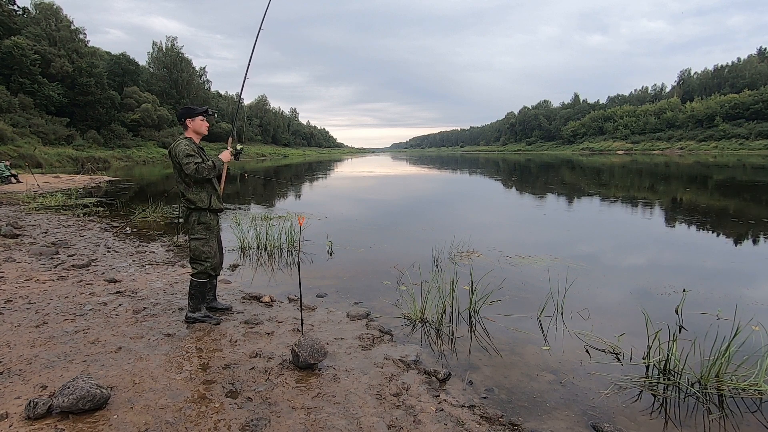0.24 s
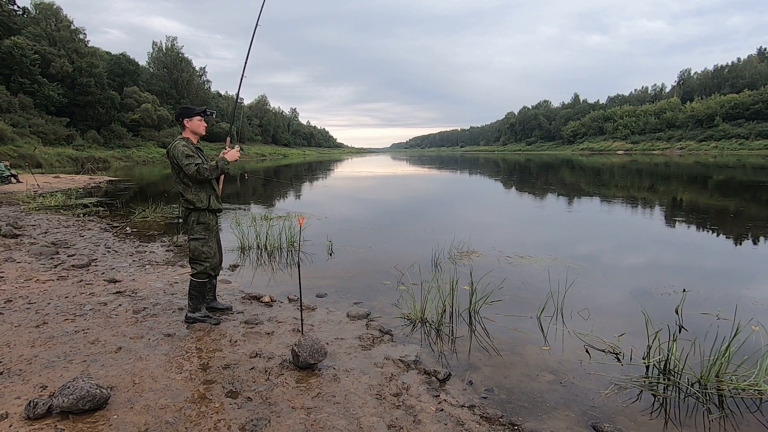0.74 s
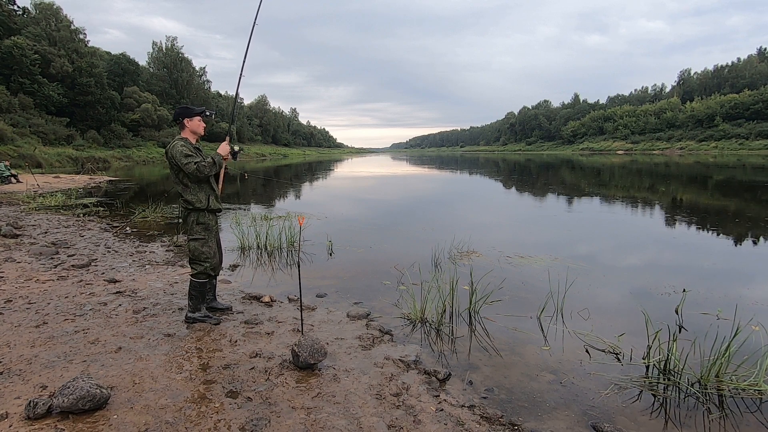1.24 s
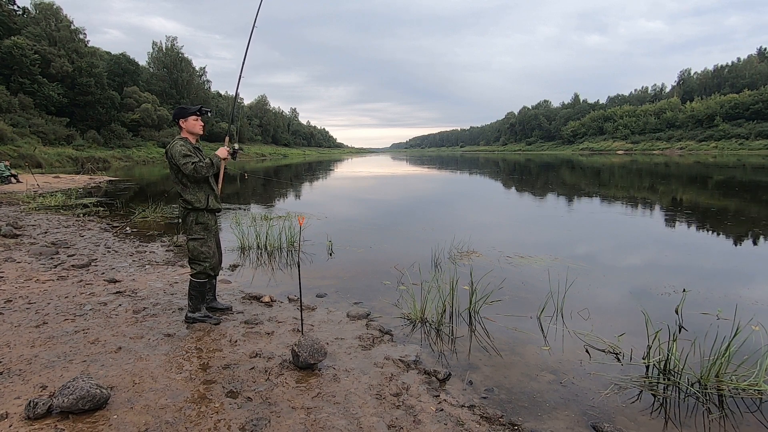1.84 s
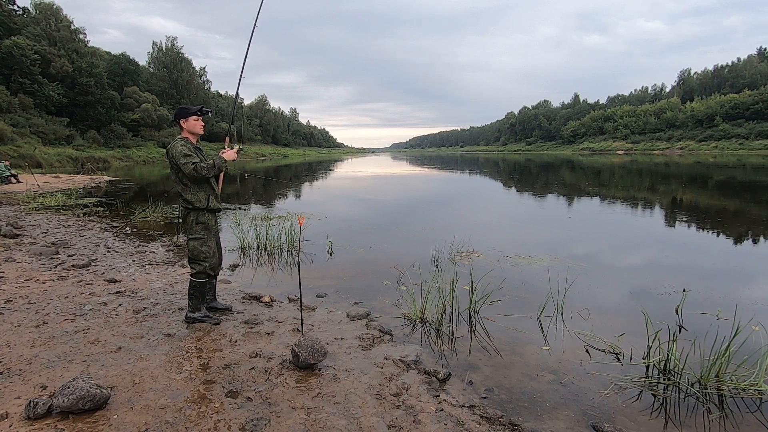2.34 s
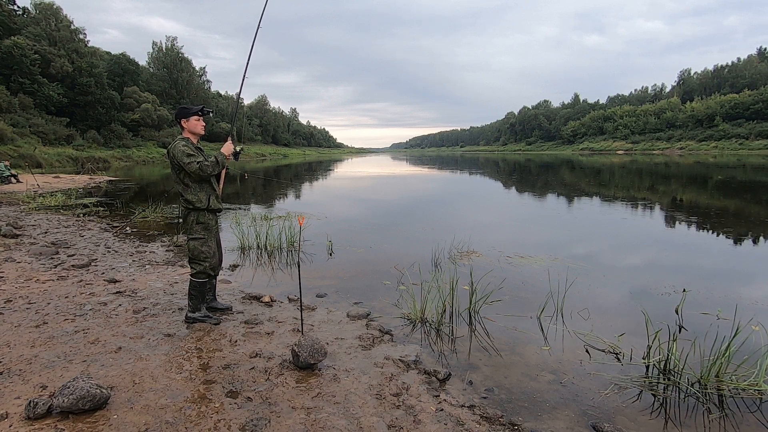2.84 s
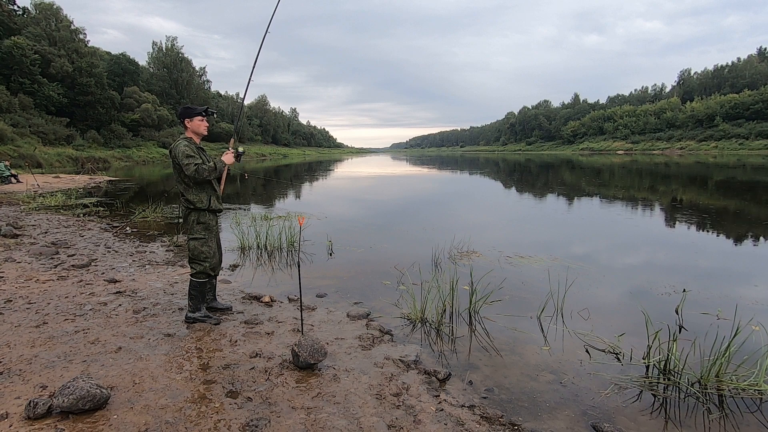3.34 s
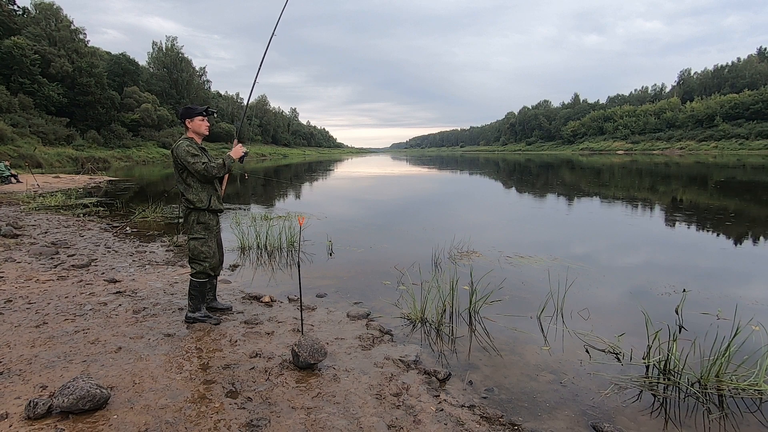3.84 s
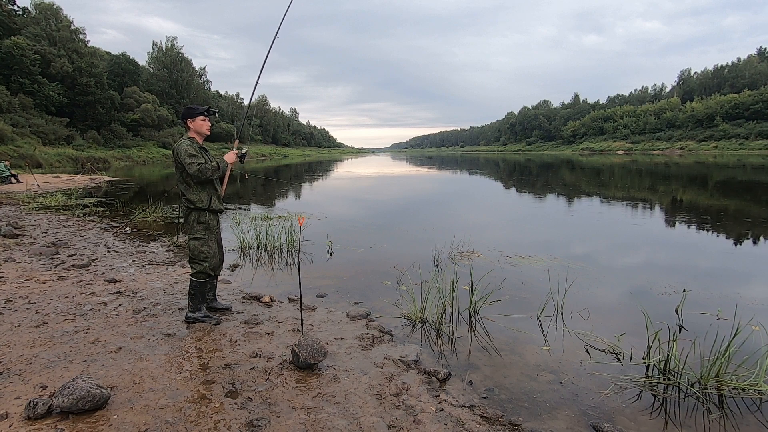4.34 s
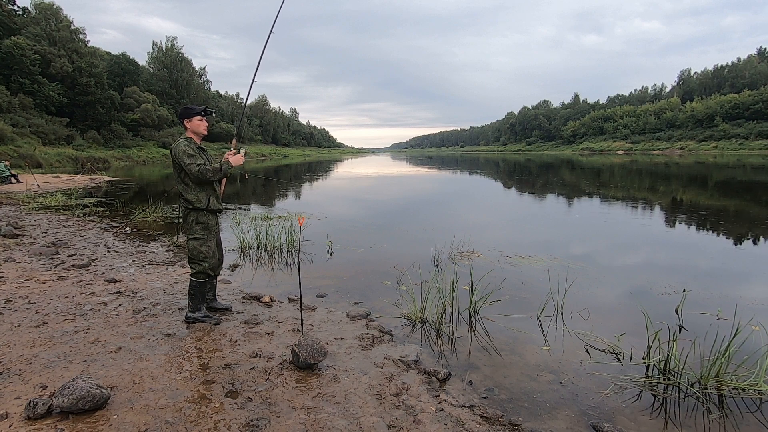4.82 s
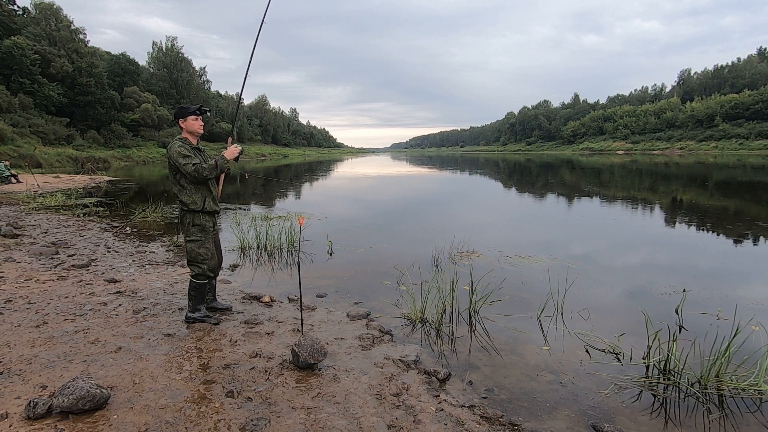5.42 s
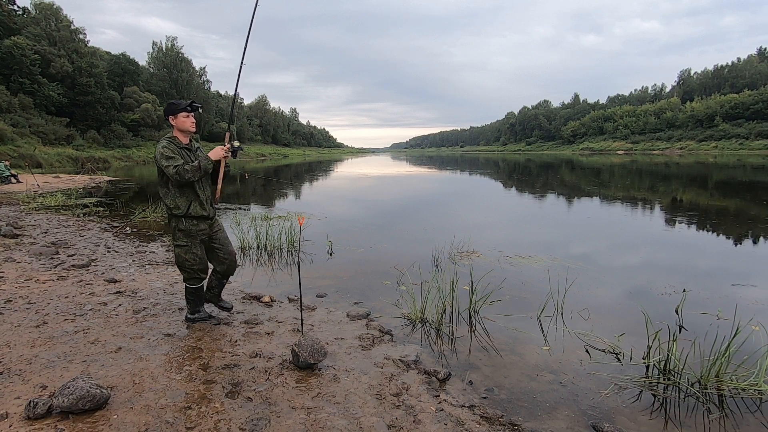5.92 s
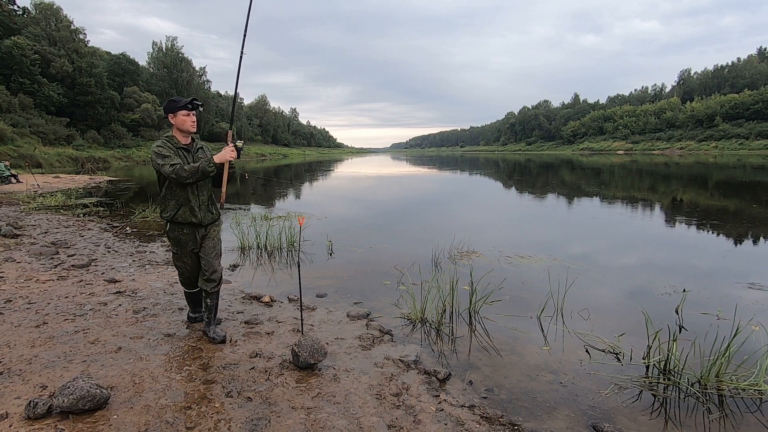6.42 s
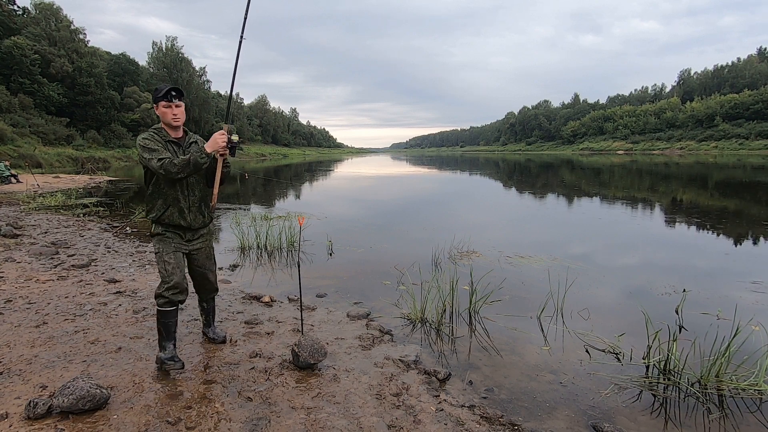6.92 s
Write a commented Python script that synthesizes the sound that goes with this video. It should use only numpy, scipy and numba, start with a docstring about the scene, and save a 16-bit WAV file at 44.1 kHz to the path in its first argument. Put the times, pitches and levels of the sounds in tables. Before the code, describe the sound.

On a quiet river bank, a few metres from the microphone, a fishing reel is wound throughout: a grainy mid-pitched whirr with an unsteady gear whine, and faint high line hiss swelling and fading. Above it a tiny rod bell rattles from the start, bright, dry ticks around 5.5 kHz, each dying almost at once, in irregular clusters; especially dense and loud near 2.4-2.7 s, sparser around 4.6-5.5 s. From 1.3 to 2 s a distant wader gives four short, high, warbled notes with some echo. Single light plastic knocks occur near 0.6, 3.8, 4.1 and 5.3 s, then a hard clatter at 5.5-5.9 s, the loudest moment. Boots squelch in mud at 6.3 and 6.6 s, and a nearer step at 7.0-7.15 s crunches and pops over a slight ground thump. A soft low hum and wide airy wash stay behind; bell and reel continue to the end.

```python
"""An angler winds in his line on a muddy river bank, a few metres from the listener, over a far hum.
From the start a tiny bell on the rod rattles as a struck, quickly damped shell; the reel's gear teeth whine
and whirr through its housing, and line hisses in the rings as band noise. A wader soon calls in warbled sines.
The reel knocks in bursts of damped modes, loudest past five seconds; then boots squelch: shaped noise and pops."""
import sys
import numpy as np
from scipy import signal
from scipy.fft import rfft, irfft
from scipy.io import wavfile
from scipy.ndimage import uniform_filter1d
from numba import njit

SR = 44100
rng = np.random.default_rng(int(sys.argv[2]) if len(sys.argv) > 2 else 0)


def inscribe(sig):
    """Save sig as 16-bit PCM at rate SR to the path in sys.argv[1].

    A 1-D sig is mono; a 2-D sig holds one channel per row.
    Samples are clipped to [-1, 1] before scaling.
    """
    pcm = np.round(np.clip(np.atleast_2d(sig).T, -1, 1) * 32767)
    wavfile.write(sys.argv[1], SR, pcm.astype(np.int16))


def to_linear_factor(level_db):
    """Convert decibel levels (scalar or array-like) to linear amplitude factors."""
    exponent = np.asarray(level_db, float) / 20
    return 10 ** exponent


N = 316197
T = np.arange(N) / SR

# modes of the bell's shell, before each blow shifts and damps them: f/Hz, level/dB, t60/s
BELL_MODES = [(5420, 5, 0.024), (5540, -6.5, 0.022), (5750, -7.5, 0.01), (6416, -22, 0.02),
              (12780, -30.5, 0.012), (14400, -40.5, 0.022)]


def unit(x):
    """Normalisation: scale to rms 1."""
    return x / np.sqrt(np.mean(x ** 2))


def pan(x, lr_db):
    """Level-difference stereo: left exceeds right by lr_db."""
    return np.array([x * to_linear_factor(lr_db / 2), x * to_linear_factor(-lr_db / 2)])


@njit
def svf(x, hz, width):
    """State-variable resonator: a band-pass whose centre may move, gain 1 at the centre."""
    y, b, l = np.empty(len(x)), 0., 0.
    for i in range(len(x)):
        g, k = np.tan(np.pi * hz[i] / SR), width / hz[i]
        v = (b + g * (x[i] - l)) / (1 + g * (g + k))
        b, l, y[i] = 2 * v - b, l + 2 * g * v, k * v
    return y


def band(x, hz, width):
    """Cascaded resonators: the same band-pass twice gives steeper skirts."""
    hz = hz + np.zeros(len(x))
    return svf(svf(x, hz, 1. * width), hz, 1. * width)


def walk(rate):
    """Smoothed random steps, rate a second: a slow fluctuation of rms 1."""
    k = int(SR / rate)
    steps = np.repeat(rng.standard_normal(N // k + 1), k)
    return unit(uniform_filter1d(uniform_filter1d(steps, k), k)[:N])


def ring(modes, rise_s):
    """Modal superposition: exponentially fading sines after a soft rise."""
    t = T[:SR // 12]
    fading = sum(to_linear_factor(db) * np.sin(2 * np.pi * hz * t) * 1000 ** (-t / t60) for hz, db, t60 in modes)
    return (1 - np.exp(-t / rise_s)) ** 2 * fading


def add(out, s, x):
    """Superposition: mix a short sound in at time s."""
    i = int(s * SR)
    out[:, i:i + x.shape[1]] += x[:, :N - i]


def sparse(rate, spread_db):
    """Random impulse train, rate a second: mostly small clicks, a few large."""
    struck = rng.random(N) < rate / SR
    return struck * to_linear_factor(spread_db * rng.exponential(size=N)) * rng.choice([-1, 1], N)


def shape(x, points):
    """Linear filtering in the spectrum: gain through (Hz, dB) points on a log axis."""
    hz, db = np.transpose(points)
    f = np.maximum(np.fft.rfftfreq(N, 1 / SR), 1)
    return irfft(rfft(x) * to_linear_factor(np.interp(np.log(f), np.log(hz), db)), N)


def peak(s, db, rise_s, fall_s):
    """Exponential envelope: climbs to db at time s and sinks, 20 dB per rise or fall time."""
    return to_linear_factor(db - 20 * np.maximum((s - T) / rise_s, (T - s) / fall_s))


def bank(x, wet_db, t60_s):
    """Diffuse reflection: short scattered echo of ground, water and trees, different left and right."""
    t = T[:SR // 3]
    tail = rng.standard_normal((2, len(t))) * 1000 ** (-t / t60_s) * (t > .003)
    tail = tail / np.sqrt(np.sum(tail ** 2) / 2)
    return x + to_linear_factor(wet_db) * signal.fftconvolve(x, tail, axes=1)[:, :N]


def valley_wash():
    """Diffuse noise field: half-octave-spaced bands flicker independently, each with its own stereo width."""
    # colour of the wash: f/Hz, nominal spectral level/dB per Hz
    wash_colour = [(25, -97.5), (65, -89), (110, -101), (150, -82), (215, -87.5), (370, -94), (500, -102),
                   (800, -91), (1050, -104), (2000, -95), (4300, -102), (6500, -103), (10500, -110),
                   (12000, -122), (15000, -126)]
    # stereo width: f/Hz, amplitude ratio of side to mid
    side_ratio = [(30, 0.78), (100, 0.63), (700, 2.34), (2000, 1.94), (6000, 0.21), (9000, 1.74),
                  (15000, 2)]
    side_hz, side_gain = np.transpose(side_ratio)
    out = 0
    for hz in 28 * 2 ** np.arange(0, 9.2, .5):
        mid, side = (unit(band(rng.standard_normal(N), hz, hz / 2)) for _ in range(2))
        wide = np.interp(np.log(hz), np.log(side_hz), side_gain)
        flicker = to_linear_factor(2.86 * walk(11))
        # power grows with bandwidth, so the spectral density is about level
        out = out + flicker * np.sqrt(hz / 3) * (mid + wide * side * np.array([[1], [-1]]))
    return shape(out, wash_colour)


def far_hum():
    """Narrow-band noise: random beating makes the hum waver."""
    return to_linear_factor(-67.5) * unit(band(rng.standard_normal(N), 151.3, 10.4))


def wader():
    """Frequency modulation: the wader's notes glide under a warble that fades."""
    # notes: t/s, length/s, first f/Hz and last f/Hz of the glide, level/dB of the sine's peak
    notes = [(1.309, 0.14, 7040, 6560, -44), (1.509, 0.11, 6810, 6690, -46),
             (1.691, 0.0993, 6820, 6610, -46), (1.887, 0.1, 6600, 6630, -53)]
    warble_hz, warble_depth_hz, warble_fade_s = 37.6, 302.2, 0.027
    out = np.zeros((2, N))
    for s, length, top_hz, last_hz, db in notes:
        t = T[:int(length * SR)]
        glide = top_hz + (last_hz - top_hz) * t / length
        warble = warble_depth_hz * np.exp(-t / warble_fade_s) * np.cos(2 * np.pi * warble_hz * t)
        tone = np.sin(2 * np.pi * np.cumsum(glide - warble) / SR)
        gain = signal.windows.tukey(len(t), .25) * to_linear_factor(db + walk(54.0)[:len(t)])
        add(out, s, pan(gain * tone, 0.37))
    return out


def mud():
    """Granular excitation: mud gives with a thud, sucks through a closing gap, and grit crunches."""
    # levels hold before the common colour in boots(); rise and fall are the times for 20 dB
    # mud giving way: t/s, level/dB, rise/s, fall/s
    thuds = [(6.33, -45.5, 0.033, 0.17), (6.58, -42.5, 0.12, 0.035), (6.625, -31.5, 0.0018, 0.012),
             (7.04, -51.5, 0.024, 0.099), (7.11, -44.5, 0.06, 0.099)]
    # grit crunching: t/s, level/dB, rise/s, fall/s
    crunches = [(6.327, -39.5, 0.033, 0.16), (6.531, -39, 0.044, 0.044), (6.57, -35.5, .04, .02),
                (6.623, -31.5, 0.0053, 0.019), (7.031, -33.5, 0.0035, 0.013), (7.051, -42, .03, 0.0038),
                (7.12, -40.5, 0.072, 0.049)]
    # mud sucking: t/s, level/dB, rise/s, fall/s, f/Hz at time t
    sucks = [(6.326, -52.5, 0.06, 0.15, 1094), (6.531, -35, 0.063, 0.023, 1360),
             (6.555, -33, 0.061, 0.034, 850), (6.623, -38, 0.01, 0.011, 1470),
             (7.16, -50, 0.11, 0.098, 1460)]
    suck_sag_hz_per_s = 1640
    thud = unit(band(sparse(611.5, 1.7), 242.6, 530))
    grit_colour = [(600, -23), (1800, 2.0), (3800, 0.0), (7000, -16.5), (10000, -6.0), (12000, -65)]
    grit = unit(shape(np.clip(sparse(2000, 1.9), -4, 4), grit_colour))
    slurp = sparse(1500, 1.7)
    sucking = 0
    for s, db, rise_s, fall_s, hz in sucks:
        gap_hz = np.clip(hz - suck_sag_hz_per_s * (T - s), 600, 1800)
        sucking = sucking + peak(s, db, rise_s, fall_s) * unit(band(slurp, gap_hz, 457))
    thudding = sum(peak(*row) for row in thuds) * thud
    crunching = sum(peak(*row) for row in crunches) * grit
    return pan(thudding + sucking + crunching, 1.0)


def sand():
    """Granular noise: wet sand sizzles under the sole as many small clicks in one band."""
    # sizzles: t/s, level/dB before the common colour in boots(), rise/s and fall/s for 20 dB
    sizzles = [(6.33, -55, .05, .15), (6.56, -63, 0.074, 0.066), (6.95, -42.5, 0.041, 0.079),
               (7.09, -47.5, 0.045, 0.15)]
    sizzle = unit(band(sparse(4400, 3.6), 6640, 1694))
    return pan(sum(peak(*row) for row in sizzles) * sizzle, 1.5)


def pops_and_thumps():
    """Damped resonance: each mud bubble, pebble or low thump is one mode, its decay time inverse to its pitch."""
    # t/s, peak level/dB before the common colour in boots(), f/Hz; the low thump at 4.13 s sounds under a reel knock
    pop_modes = [(4.13, -50, 336.7), (6.31, -27, 2780), (6.325, -38, 196), (6.381, -27, 1900),
                 (6.397, -29, 2160), (6.534, -39, 1483), (6.582, -35, 186), (6.768, -45.5, 342),
                 (6.919, -46.5, 266.5), (6.338, -36, 3400), (7.0391, -17, 3340), (7.042, -22, 2575),
                 (7.044, -29, 2800), (7.1205, -24, 3960), (7.127, -29, 2970), (7.1452, -27, 2880),
                 (7.159, -23, 3340)]
    out = np.zeros((2, N))
    for s, db, hz in pop_modes:
        rise_s = 0.33 / hz + 0.008 * (hz < 500)  # low ones start softer
        pop = ring([(hz, 0, 8 / hz)], rise_s)
        add(out, s, pan(to_linear_factor(db) * pop / np.abs(pop).max(), 0.52))
    return out


def boots():
    """Superposition: boot sounds, pops and thumps under one colour, plus a rumble carried by the ground."""
    # the last, nearest step reaches the ground under the microphone
    ground = peak(7.1, -51, 0.043, .05) * unit(band(rng.standard_normal(N), 70, 80))
    contacts = mud() + sand() + pops_and_thumps()
    return shape(contacts, [(70, -24), (140, 2.0), (6000, -2.5), (12000, -15.0)]) + ground


def knocks():
    """Impact excitation of modes: plastic on plastic, each blow with its own spectral tilt."""
    # blows: t/s, peak level/dB before colouring, tilt/dB per octave, frequency factor of the modes under the hand
    knock_blows = [(0.56, -38, 2, 1.1), (3.819, -37, 13, 0.94), (4.131, -43, -45, 0.83),
                   (5.272, -35, 11, 0.85), (5.5316, -24.5, 16.5, 0.86), (5.5488, -32, 17, 0.9),
                   (5.655, -38, -1, 1.13), (5.7377, -15.5, 5, 0.97), (5.7609, -35, 2, 0.76),
                   (5.7602, -21, 7, 1), (5.829, -18, 6, 1.04), (5.8747, -20, 8, 1.06)]
    # modes before tilt and stretch: f/Hz, level/dB, t60/s
    knock_modes = [(820, -12, 0.009), (1270, 0, 0.019), (1750, 3, 0.01), (2250, -4, 0.009), (2790, 2, 0.01),
                   (3560, -5, 0.008), (4760, -10, 0.006), (5800, -17, 0.006)]
    out = np.zeros((2, N))
    for s, db, tilt_db, stretch in knock_blows:
        modes = [(hz * stretch, g + tilt_db * np.log2(hz / 1200), t60) for hz, g, t60 in knock_modes]
        blow = ring(modes, 0.00007)
        add(out, s, pan(-to_linear_factor(db) * blow / np.abs(blow).max(), 3.15))
    return shape(out, [(250, -11.5), (900, 2.5), (4500, 4.5), (7000, -14)])


def line_hiss():
    """Friction noise: wet line runs through the rod rings, and the hiss drops in pitch as it swells."""
    # wet stretches: t/s at the middle, level/dB before the quarter gain below, length/s
    swishes = [(0.143, -55, 0.78), (1.85, -56.5, 1), (2.549, -52, 0.39), (2.87, -56.5, 0.44),
               (3.347, -56.5, 0.6), (3.84, -52, 0.23), (4.314, -51.5, 0.99), (5.024, -53, 0.38),
               (5.8, -63, .2), (6.486, -53, 0.89)]
    swells = [np.exp(-8 * ((T - s) / length) ** 2) for s, _, length in swishes]
    hiss_hz = 9820 - 540 * np.max(swells, axis=0)
    hiss = np.array([unit(band(rng.standard_normal(N), hiss_hz, 1500)) for _ in range(2)])
    hiss = hiss * to_linear_factor(1.8 * walk(25))
    wet = to_linear_factor(-81) + sum(to_linear_factor(row[1]) * swell for row, swell in zip(swishes, swells))
    return pan(0.25, 5.3)[:, None] * hiss * wet


def gear_whine():
    """Harmonic series at the meshing rate of the unevenly turned crank; returned with its gain."""
    # crank: t/s, mean meshing f/Hz, whine against the whirr level/dB
    crank = [(0.0, 620, -10), (0.341, 515, -15), (0.58, 740, -0.5), (0.74, 530, 1), (0.88, 516, -2),
             (0.94, 756, 0), (1.141, 550, -7.5), (1.279, 543, -8), (1.421, 780, 1.5), (1.52, 650, -4.5),
             (1.8, 600, -4), (1.88, 550, -8), (2.04, 660, 3), (2.29, 685, -4), (2.389, 557, -4.5),
             (2.48, 538.5, 1.5), (2.559, 720, 4.5), (2.64, 525, 1), (2.72, 540, -12), (2.85, 590, -4),
             (2.93, 596, -3.5), (3.05, 730, -3), (3.39, 534, -6), (3.87, 570, -7), (3.951, 600, -2),
             (4.03, 529.7, -1), (4.17, 600, -7), (4.25, 735, 8), (4.29, 650, -4.5), (4.77, 546, -7),
             (4.85, 687.4, 3), (4.91, 630, -11), (4.99, 810, 7), (5.05, 640, -1.5), (5.17, 620, 3.5),
             (5.28, 580, -11), (5.55, 510, -10), (6.19, 515, -9), (6.371, 790, -2.5), (6.571, 660, -11),
             (6.67, 820, 4.5), (6.73, 685, -0.5), (6.93, 710, 2.5), (6.99, 560, -1.5), (7.17, 630, -8)]
    s, mesh_hz, whine_db = np.transpose(crank)
    mesh_hz = np.interp(T, s, mesh_hz) * (1 + .024 * walk(40))
    phase = 2 * np.pi * np.cumsum(mesh_hz) / SR
    # the third harmonic is strongest, 4 dB lost per harmonic away from it
    whine = sum(to_linear_factor(6 * np.tanh(walk(35)) - 4 * abs(k - 3)) * np.cos(k * phase) for k in range(1, 8))
    return whine, to_linear_factor(np.interp(T, s, whine_db))


def line_roller():
    """Harmonics of a drifting rotation: the line roller spins at its own speed, singing in broken strands."""
    spin_hz = 430 * (1 + .07 * walk(12) + .03 * walk(70))
    spin = 2 * np.pi * np.cumsum(spin_hz) / SR
    return sum(to_linear_factor(6 * np.tanh(walk(30))) * np.cos(k * spin) for k in range(3, 9))


def reel():
    """Source and resonator: gear teeth whine and rub, both heard through the housing's resonances."""
    # winding: t/s, whirr level/dB, brightness/dB per octave as the reel faces the microphone
    winding = [(0.0, -51, -4.5), (0.5, -50, 0.5), (0.9, -50, 7.5), (1.5, -48.5, -1), (1.9, -50.5, -0.5),
               (2.6, -50.5, -0.5), (3.35, -48.5, -1.5), (3.7, -51.5, -5), (4.05, -49, -0.5),
               (4.7, -49.5, 2), (5.1, -48, 2), (5.5, -49, 2.5), (6.07, -50.5, -0.5), (6.5, -49.5, -1.5),
               (6.85, -50.5, -3), (7.17, -50.5, -3)]
    # housing resonances before widening and grip: f/Hz, bandwidth/Hz, level/dB
    resonances = [(852, 175, -16.5), (850, 11.7, -9.5), (1327, 155, -13), (1791, 61, 2.5),
                  (1971.5, 108, -1), (2143, 176, 2.5), (2697, 61, 3), (2911, 94, -1), (3354, 214, -6)]
    # grip as he turns: t/s, frequency factor of the resonances
    grip_turns = [(5.3, 1.0), (5.7, 1.05), (6.4, 1.05), (6.7, .98)]
    s, whirr_db, bright_db = np.transpose(winding)
    bright_db = np.interp(T, s, bright_db)
    grip = np.interp(T, *np.transpose(grip_turns))
    # the turning hand damps each resonance in its own time
    hand = [to_linear_factor(g + 1.5 * walk(4.94) + bright_db * np.log2(f / 2200)) for f, _, g in resonances]

    def housing(x, widen):
        """Parallel resonances colour the source."""
        return unit(sum(g * band(x, f * grip, widen * w) for (f, w, _), g in zip(resonances, hand)))

    rubbing = unit(sparse(6000, 1.85)) + to_linear_factor(-10.0) * unit(line_roller())
    whine, whine_gain = gear_whine()
    whirr = housing(rubbing, 2.04) + whine_gain * housing(whine, 1.77)
    return pan(whirr * to_linear_factor(np.interp(T, s, whirr_db)), 0.67)


def tuned(hz):
    """Modal detuning: the pea in the slot shifts only the modes below 8 kHz, the main one to hz."""
    return [(f + (hz - BELL_MODES[0][0]) * (f < 8000), g, t60) for f, g, t60 in BELL_MODES]


def bell_blows():
    """Impact excitation: the pea strikes new places, so side modes, tick and direction change at each blow."""
    # loud blows: t/s, peak level/dB of the ringing before panning, main mode f/Hz
    blows = [(0.0115, -33.5, 5400), (0.078, -29, 5520), (0.0858, -24.5, 5360), (0.093, -29, 5690),
             (0.164, -26.5, 5540), (0.171, -36, 5800), (0.226, -36, 5660), (0.263, -36.5, 5420),
             (0.279, -40, 5570), (0.3224, -32.5, 5540), (0.445, -34.5, 5620), (0.468, -34, 5700),
             (0.566, -37.5, 5530), (0.6041, -30, 5520), (0.611, -34, 5300), (0.627, -29.5, 5540),
             (0.7203, -36, 5640), (0.7328, -31.5, 5360), (0.8558, -48, 5730), (0.8736, -40, 5660),
             (0.8955, -35, 5720), (0.9128, -35, 5960), (0.93, -34, 5490), (0.962, -37, 5430),
             (0.9881, -38, 5540), (1.0044, -30, 5750), (1.0199, -29.5, 5560), (1.0631, -33.5, 5480),
             (1.068, -34, 5700), (1.138, -30, 5540), (1.149, -33, 5420), (1.2171, -28, 5440),
             (1.2552, -32.5, 5720), (1.3102, -30, 5400), (1.3268, -39, 5500), (1.3356, -36, 5430),
             (1.3777, -38, 5536), (1.3988, -32.5, 5610), (1.41, -33, 5550), (1.433, -35.5, 5400),
             (1.474, -27.5, 5440), (1.49, -27.5, 5550), (1.4998, -31, 5486), (1.5091, -33, 5440),
             (1.667, -32.5, 5405), (1.702, -31, 5400), (1.7591, -37, 5500), (1.775, -32, 5400),
             (1.8284, -29.5, 5380), (1.8469, -35, 5530), (1.8815, -31, 5530), (1.897, -36, 5420),
             (1.9076, -29, 5500), (1.9364, -32, 5400), (1.9411, -34, 5460), (1.9578, -29, 5450),
             (1.972, -31.5, 5520), (1.9932, -34, 5540), (2.0743, -31.5, 5560), (2.3424, -33.5, 5650),
             (2.3732, -30.5, 5490), (2.384, -28, 5400), (2.3898, -23, 5710), (2.401, -28, 5560),
             (2.4098, -27.5, 5490), (2.4693, -29.5, 5340), (2.476, -25, 5420), (2.4876, -43, 5650),
             (2.5082, -23.5, 5420), (2.5878, -30, 5380), (2.597, -20, 5490), (2.6044, -21.5, 5420),
             (2.6104, -28, 5434), (2.6166, -23.5, 5520), (2.638, -24, 5560), (2.6461, -35, 5250),
             (2.699, -32, 5480), (2.715, -34, 5460), (2.7267, -33.5, 5470), (2.7951, -34, 5370),
             (2.811, -31, 5430), (2.8194, -27, 5420), (2.8234, -28, 5380), (2.83, -36, 5410),
             (2.8981, -26, 5470), (2.912, -28.5, 5417), (3.1412, -37, 5510), (3.271, -36, 5470),
             (3.2876, -24.5, 5410), (3.3278, -33, 5420), (3.3521, -28.5, 5410), (3.3611, -28, 5473),
             (3.374, -24, 5440), (3.3992, -32.5, 5450), (3.4244, -34, 5500), (3.437, -29.5, 5420),
             (3.4479, -41, 5710), (3.4902, -22.5, 5480), (3.507, -29.5, 5420), (3.5225, -31, 5450),
             (3.588, -35, 5430), (3.6344, -33, 5420), (3.644, -35, 5420), (3.7175, -27.5, 5580),
             (3.8058, -36, 5420), (3.816, -29, 5420), (3.823, -37, 5430), (3.883, -37.5, 5400),
             (3.9084, -25.5, 5540), (3.9305, -40, 5764), (3.9489, -41, 5514), (4.0643, -38, 5610),
             (4.0797, -44, 5790), (4.1074, -39.5, 5750), (4.175, -40, 5770), (4.281, -37, 5600),
             (4.29, -30, 5520), (4.3059, -25, 5450), (4.3269, -33, 5470), (4.3903, -28.5, 5420),
             (4.417, -36, 5600), (4.4252, -33, 5680), (4.4803, -35.5, 5720), (4.5435, -33.5, 5420),
             (4.559, -29, 5480), (4.5824, -35, 5420), (4.6391, -34, 5420), (4.8993, -37.5, 5570),
             (4.9136, -40, 5440), (4.9218, -31.5, 5410), (5.0025, -30, 5630), (5.0078, -35.5, 5770),
             (5.0834, -34.5, 5434), (5.237, -45, 5650), (5.6019, -35.5, 5630), (5.6882, -33, 5510),
             (5.7066, -23.5, 5440), (5.7241, -32, 5440), (5.776, -38, 5540), (5.7844, -22.5, 5406),
             (5.7983, -31, 5400), (5.812, -37, 5420), (5.824, -37, 5430), (5.8458, -39, 5330),
             (5.8515, -39, 5320), (5.8708, -40, 5480), (6.055, -32, 5560), (6.06, -36, 5380),
             (6.0788, -41, 5490), (6.0958, -31, 5470), (6.148, -34, 5420), (6.174, -30.5, 5460),
             (6.1815, -34, 5560), (6.1998, -35, 5350), (6.233, -33, 5470), (6.2415, -25, 5470),
             (6.277, -30, 5640), (6.2826, -35, 5700), (6.305, -31.5, 5465), (6.3658, -27.5, 5580),
             (6.3984, -32, 5390), (6.4391, -25.5, 5540), (6.4494, -43, 5560), (6.5726, -26, 5410),
             (6.591, -31, 5420), (6.6179, -34.5, 5530), (6.7003, -35.5, 5470), (6.7264, -28.5, 5480),
             (6.739, -33, 5470), (6.7498, -28, 5400), (6.7706, -28, 5510), (6.7898, -33.5, 5530),
             (6.8291, -28.5, 5560), (6.8646, -24.5, 5527), (6.8762, -38, 5546), (6.9288, -36, 5400),
             (6.9344, -29, 5390), (6.9577, -33, 5430), (6.9651, -30, 5450), (6.982, -29, 5480),
             (6.9931, -36, 5420), (6.9974, -34, 5400), (7.008, -34, 5370), (7.014, -33, 5450),
             (7.0384, -31, 5420), (7.072, -25.5, 5580), (7.0782, -34, 5720), (7.0872, -35, 5700),
             (7.1268, -31, 5750), (7.1452, -34, 5940)]
    out = np.zeros((2, N))
    tick = unit(band(rng.standard_normal(SR // 12), 7360, 7000)) * np.exp(-T[:SR // 12] / 0.0057)
    scatter_db = 4 * (np.arange(len(BELL_MODES)) > 0)  # the main mode keeps its level
    for s, db, hz in blows:
        mode_db = scatter_db * rng.standard_normal(len(BELL_MODES))
        damping, place, side = rng.standard_normal(3)
        damp = np.exp(0.49 * damping - (hz - BELL_MODES[0][0]) / 600)  # higher blows die sooner
        modes = [(f * (1 + 0.0032 * place * (f > 8000)), g + c, t60 * damp)
                 for (f, g, t60), c in zip(tuned(hz), mode_db)]
        blow = ring(modes, 0.00061)
        blow = blow / np.abs(blow).max() + to_linear_factor(-36.0 + 12.5 * np.tanh(place)) * tick
        add(out, s, pan(to_linear_factor(db) * blow, -1.5 + 1.6 * side))
    return out


def bell_touches():
    """Convolution of random impulses with the modes: small touches between the blows as the rod shakes."""
    # shaking of the rod: t/s, rms level/dB of the touches before panning
    shaking = [(0.0, -51), (0.4, -57.5), (0.95, -52), (1.5, -52.5), (1.95, -53.5), (2.25, -64),
               (2.6, -50.5), (3.1, -56.5), (3.4, -53), (4.4, -57), (4.7, -68), (5.55, -67), (5.75, -51.5),
               (5.95, -56), (6.27, -53), (6.6, -53), (6.9, -47.5), (7.17, -50)]
    touches = 0
    for hz in (5400, 5560, 5720, 5680):
        strikes = np.clip(sparse(24, 9.3), -2.2, 2.2)
        touches = touches + signal.fftconvolve(strikes, ring(tuned(hz), 0.00017))[:N]
    return pan(unit(touches) * to_linear_factor(np.interp(T, *np.transpose(shaking))), -3.0)


def scene():
    """Direct-to-reverberant ratio as distance: the far bird has the strongest and longest echo."""
    background = valley_wash() + far_hum() + bank(wader(), -4.0, 0.24)
    winding_in = bank(knocks(), -12, 0.1) + bank(reel() + line_hiss(), -13.0, 0.15)
    return background + winding_in + bank(bell_blows() + bell_touches() + boots(), -6.0, 0.1)


def top_cut(x):
    """Nothing passes above the cut-off."""
    return signal.sosfilt(signal.butter(12, 15400, fs=SR, output="sos"), x)


def record(dry):
    """Linear superposition is complete: the mix goes out without further gain."""
    return top_cut(dry)


dry = scene()
out = record(dry)
inscribe(out)
```